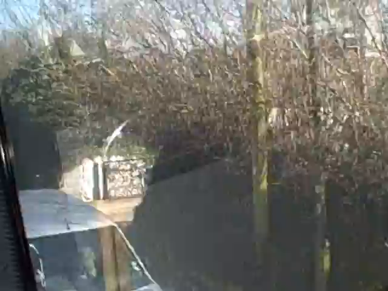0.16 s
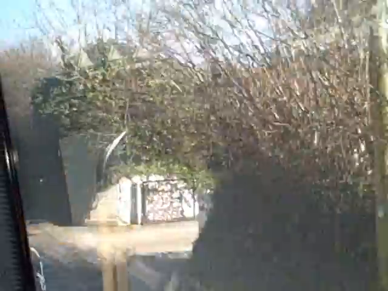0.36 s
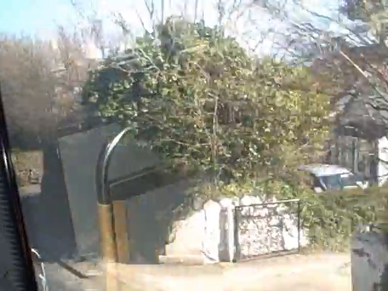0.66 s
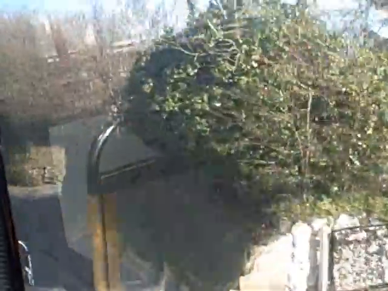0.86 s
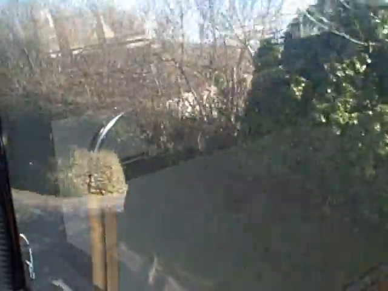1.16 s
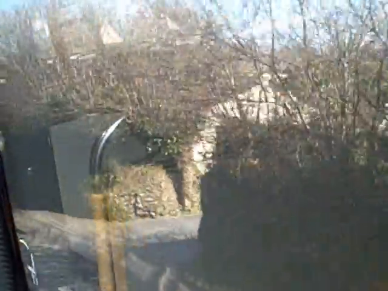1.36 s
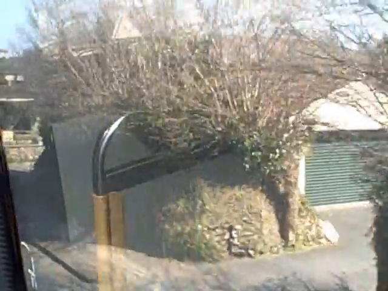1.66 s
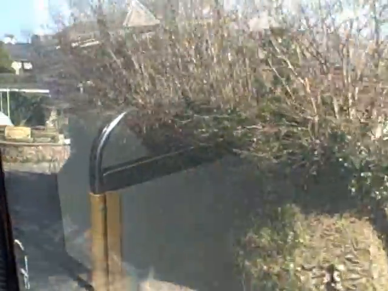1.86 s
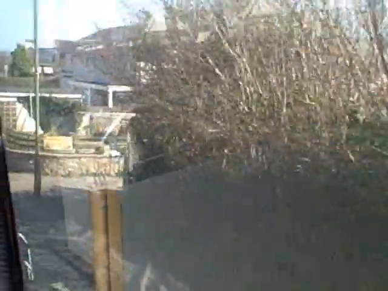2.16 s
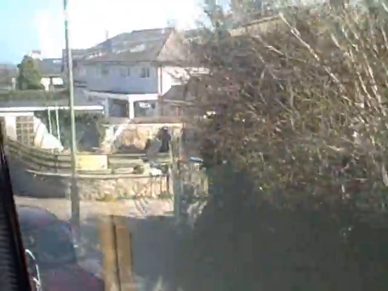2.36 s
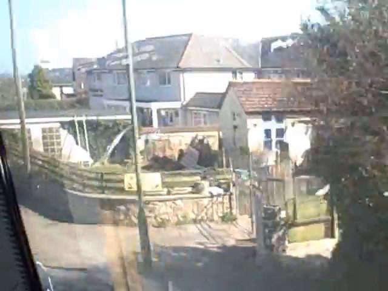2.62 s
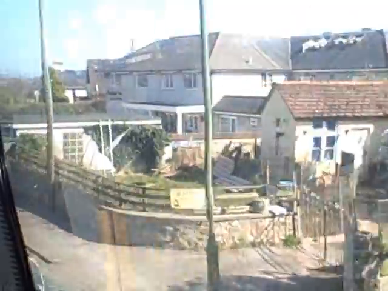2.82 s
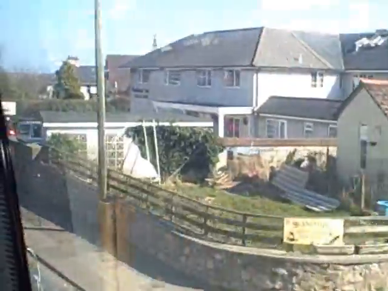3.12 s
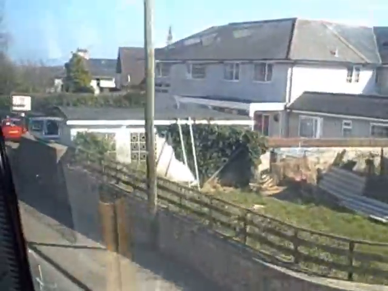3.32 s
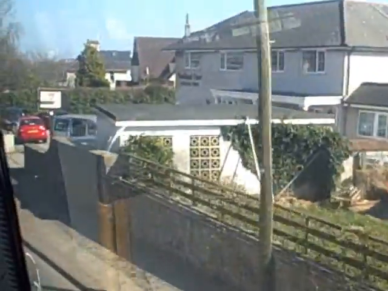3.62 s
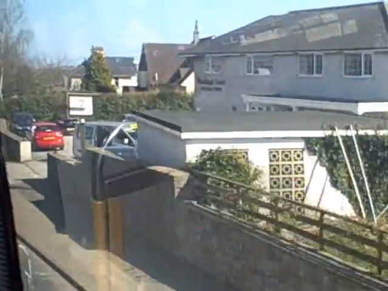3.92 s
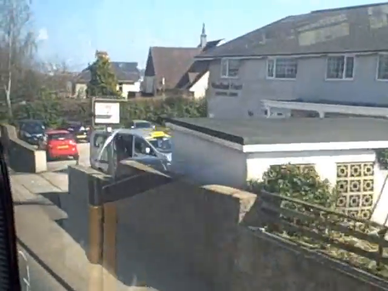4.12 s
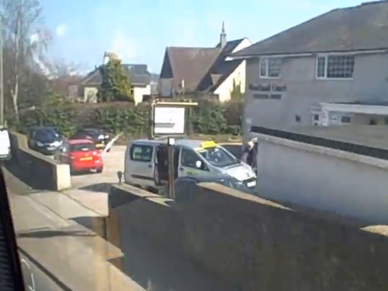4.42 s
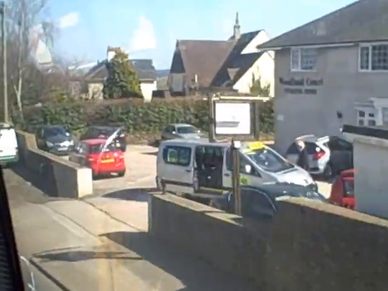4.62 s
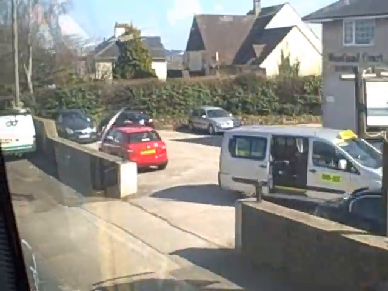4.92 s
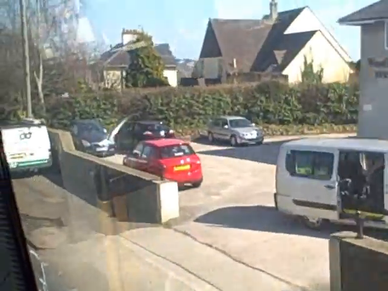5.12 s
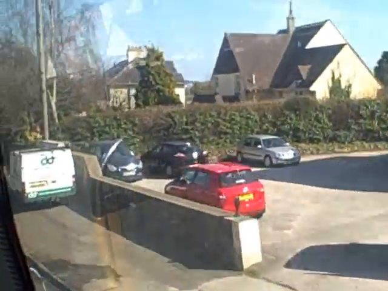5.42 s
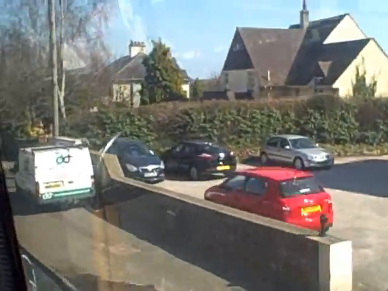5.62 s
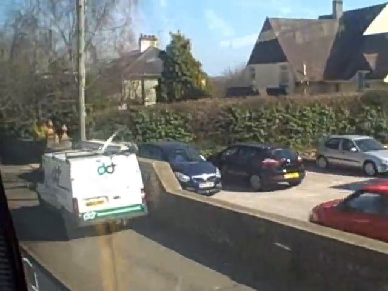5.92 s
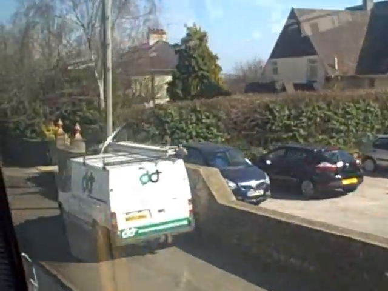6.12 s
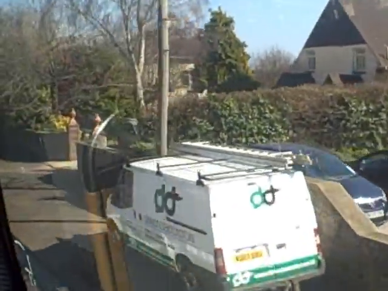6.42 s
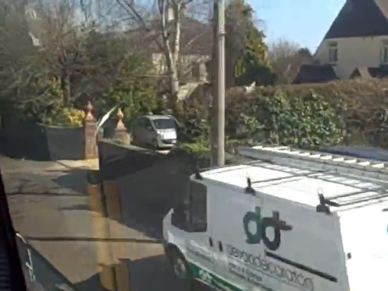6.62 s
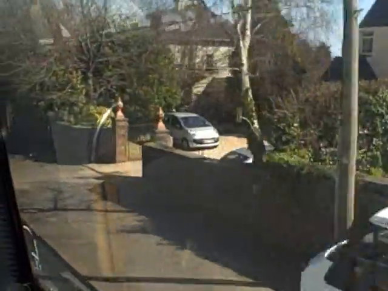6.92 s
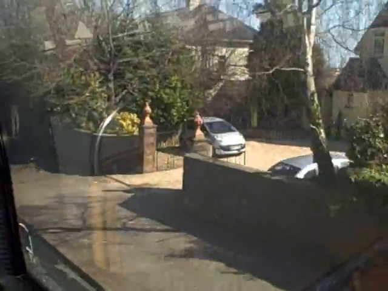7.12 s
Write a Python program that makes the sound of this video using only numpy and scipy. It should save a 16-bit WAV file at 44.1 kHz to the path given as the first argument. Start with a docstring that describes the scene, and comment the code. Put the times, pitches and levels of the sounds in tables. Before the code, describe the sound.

A bus cabin on a rough road: thick low rumble, humming diesel in one gear, soft combustion clatter and thin gear whine. Branches swish past in the first half second. The body shakes in uneven bursts with dry plastic rattles and bright ticks. Heavy pothole blows hit past five seconds, clipping and ducking the close microphone, and another jolt follows near 6.7 seconds as the drone carries on.

```python
"""Six-cylinder diesel and driveline of a double-decker bus drone through the cabin as speed slowly rises in one gear.
The drone is sine orders of engine speed, with gear whine and pulsed-noise combustion clatter.
Shaped noise makes the tyre roar, floor boom, body shaking, air hiss and twigs along the side.
Trim and small fittings rattle as bursts of ringing noise; panels knock as decaying sines.
Hard jolts are single low pushes, and a gain control ducks the din after an overload."""
import sys
import numpy as np
from scipy import signal
from scipy.fft import rfft, irfft, next_fast_len
from scipy.io import wavfile
from scipy.ndimage import uniform_filter1d, minimum_filter1d, map_coordinates

SR = 44100
rng = np.random.default_rng(int(sys.argv[2]) if len(sys.argv) > 2 else 0)


def unload_wav(signal):
    """Save mono or channel-first audio to the path in sys.argv[1] as 16-bit WAV at rate SR, clipped to [-1, 1]."""
    wavfile.write(
        sys.argv[1],
        SR,
        np.round(np.clip(np.atleast_2d(signal).T, -1, 1) * 32767).astype(np.int16),
    )


N = 320607

# Engine speed: (time [s], four-stroke cycle rate [1/s])
ENGINE_SPEED = [(0.0, 10.828), (0.48, 10.874), (0.97, 10.871), (1.45, 10.891), (1.94, 10.917),
                (2.42, 10.973), (2.91, 11.03), (3.39, 11.059), (3.88, 11.114), (4.36, 11.168),
                (4.85, 11.228), (5.33, 11.265), (5.82, 11.321), (6.3, 11.369), (6.79, 11.414),
                (7.27, 11.417)]
MIDDLE_SPEED_HZ = 11.14  # engine cycle rate
# Drone; mostly whole orders from the engine; fractional ones and 84 from the geared driveline:
# (multiple of cycle rate [-], level at middle speed [dB], slope [dB per cycle/s])
DRONE_ORDERS = [(12, -25, 7), (13, -35, -4), (13.62, -36.5, -9), (15, -28.3, -2), (17, -42, 5),
                (18, -42, -6), (19, -41, 9), (20, -46, -8), (20.43, -46, 9), (21, -33.5, -14), (22, -47, 2),
                (22.7, -36, -12), (25, -41, 9), (27.24, -44, 29), (28, -46, 6), (30, -51, 17),
                (31.78, -49, -7), (42, -57, 4), (44, -54, 13), (49.7, -54, 11), (60, -61, 20),
                (84, -55.5, 16), (88, -62, 12)]
# Drone level, slow changes, strongest in high orders: (time [s], level change at order 15 [dB])
DRONE_LEVEL = [(0, -1.5), (3, 0), (4.5, .5), (5.3, -0.5), (5.7, 2.5), (6.4, 0.45), (7.27, .5)]
# Gear whine: (time [s], relative tooth tone level [dB], relative octave level [dB])
GEAR_WHINE = [(0, -61, -77), (.5, -56, -76), (.8, -59, -75), (1.22, -56, -76), (1.31, -51, -78),
              (1.4, -58, -77), (2.1, -57, -73), (2.5, -63, -78), (5.5, -66, -77), (6.95, -64, -70),
              (7.04, -63, -62.5)]
TEETH_PER_CYCLE = 144  # tooth meshes per engine cycle
# Combustion clatter: (time [s], level [dB])
CLATTER_LEVEL = [(0, -42), (.35, -40), (.7, -45.5), (2, -46), (2.35, -45), (2.62, -40.5), (3.3, -47.5),
                 (4.3, -46.5), (5.3, -44.5), (5.55, -46), (6.3, -48), (6.7, -45), (7.27, -46)]
# Air hiss: (time [s], level [dB])
AIR_LEVEL = [(0, -55.5), (.33, -52), (.65, -59.5), (1.6, -61), (2.3, -64), (2.6, -56.5), (3.1, -56),
             (4.2, -61), (4.5, -62.5), (5.3, -55), (5.9, -61.5), (7.27, -61)]
# Road surface, before bumps: (time [s], tyre roar level [dB], floor boom level [dB])
ROAD_LEVELS = [(0, -30.5, -24), (1.1, -31, -26), (2, -31.5, -23.5), (3.4, -32, -26), (3.75, -30, -24.5),
               (4.05, -30.5, -30.5), (4.45, -32.5, -27.5), (4.9, -33, -24.5), (5.3, -31, -23.5),
               (5.7, -34, -25), (6.3, -33, -24.5), (7.27, -32.5, -26.5)]

# Rough road: (full strength from [s], hold [s], relative shaking [dB], relative chatter [dB])
ROUGH_STRETCHES = [(0.173, 0.17, -24.5, -55), (.52, .15, -21.5, -65), (0.863, 0.091, -14.5, -48.5),
                   (1.13, 0.37, -19, -57.5), (1.68, 0.11, -29, -55), (2.52, 0.22, -17.5, -53.5),
                   (2.891, .25, -13.5, -48.5), (3.172, 0.094, -11.5, -51), (3.394, 0.42, -21, -55),
                   (3.9, 0.2, -11.5, -50.5), (4.128, 0.15, -23, -58), (4.808, .15, -17, -49.5),
                   (5.03, 0.11, -19.5, -56), (5.244, 0.29, -10.5, -45), (5.5, 0.57, -13, -59),
                   (6.231, 0.078, -11.5, -52.5), (6.47, 0.086, -15, -55), (6.613, 0.074, -8.5, -45),
                   (6.83, 0.1, -24, -53)]
BUMP_ATTACK_S, SHAKE_RELEASE_S, CHATTER_RELEASE_S = 0.025, 0.059, 0.042
SMOOTH_SHAKE_DB, SMOOTH_CHATTER_DB = -21.5, -69  # floor on smooth road
# Pothole jolts: (time [s], peak level [dB], half length of push [s])
POTHOLE_JOLTS = [(5.286, 0, .016), (5.404, 7.5, .019), (5.476, 4.5, .021), (6.665, -2.5, .013)]
# Body panel knocks: (time [s], relative level [dB])
PANEL_KNOCKS = [(.34, -29), (.968, -27), (1.12, -29), (3.697, -24), (3.735, -26), (3.815, -30), (3.89, -26),
                (4.021, -19.5), (4.305, -25)]
# Panel modes: (frequency [Hz], mean relative level [dB], t60 [s])
PANEL_MODES = [(310, 1, .08), (365, 1, .07), (420, -2, .06), (490, -3, .06), (575, -5, .05), (660, -1, .05),
               (770, -4, .04)]

# Trim against its frame: (first blow [s], number of blows [-], relative level [dB])
TRIM_RATTLES = [(.545, 2, -34), (.636, 3, -35.5), (.838, 2, -34), (.99, 1, -35.5), (1.155, 2, -35),
                (1.346, 1, -35.5), (1.447, 1, -40), (1.786, 5, -31), (2.188, 1, -38.5), (2.521, 1, -29.5),
                (2.62, 1, -36), (2.851, 1, -33.5), (2.928, 2, -33.5), (3.224, 1, -30.5), (3.295, 1, -37),
                (3.371, 1, -39), (3.664, 2, -30.5), (3.757, 1, -36), (3.944, 6, -32), (4.304, 1, -32),
                (4.662, 1, -36), (4.769, 2, -35), (4.961, 1, -32), (5.088, 2, -33.5), (5.242, 1, -26.5),
                (5.283, 1, -30.5), (5.33, 2, -28), (5.724, 3, -38), (6.227, 1, -34), (6.397, 1, -32.5),
                (6.489, 5, -32), (6.755, 1, -36), (6.858, 4, -32), (7.17, 1, -36)]
SWING_S = 0.057  # between blows of a run
RUN_FADE_DB, BLOW_SCATTER_DB = 0.77, 1.3  # loss per blow, standard deviation
# Close small fitting: (time [s], relative level [dB])
FITTING_TICKS = [(0.4693, -27), (0.9492, -36), (1.2176, -35), (2.0892, -43), (3.0849, -32), (3.1772, -32),
                 (3.5134, -29.5), (3.7888, -31), (3.9075, -37), (4.0637, -32), (4.4313, -39),
                 (4.8708, -26.5), (5.0838, -31), (5.3443, -24), (5.3622, -28), (5.4121, -15.5),
                 (5.5817, -24), (6.2706, -34), (6.5266, -27), (6.6338, -23), (6.8304, -38)]
BOUNCE_T60_S, CHATTER_T60_S = 0.014, 0.035

# Twigs: (middle [s], 1/e half length [s], centre [Hz], relative level [dB])
TWIG_SWISHES = [(0.24, 0.083, 8200, -47), (0.34, 0.066, 6100, -51), (0.22, 0.055, 3900, -54),
                (0.68, 0.091, 8400, -60), (1.667, 0.063, 7800, -57.5)]
# Twig squeal on glass: (frequency [Hz], mean relative level [dB])
SQUEAL_PARTIALS = [(3850, -6), (6550, 0), (8250, -9), (11600, -10), (13000, -8)]

# Noise spectra: (frequency [Hz], relative density [dB per Hz])
SWAY_SPECTRUM = [(4, -30), (9, -8), (14, 0), (18, -6), (23, -24), (40, -60)]
JUDDER_SPECTRUM = [(14, -53), (21, 4), (26, -4), (31, -2.5), (38, -18.5), (48, -31.5), (80, -44)]
BOOM_SPECTRUM = [(25, -28), (42, -0.5), (52, 3), (63, -8.5), (84, 4), (100, -4), (120, -16), (200, -51)]
ROAR_SPECTRUM = [(80, -21), (125, 4.5), (150, 13.5), (200, 8.5), (250, 5), (330, 8), (420, 0.5), (510, 1),
                 (670, -2), (780, -6.5), (950, -6.5), (1200, -17), (2500, -52)]
CLATTER_SPECTRUM = [(400, -25), (800, 2.5), (1000, 3.5), (1200, -1), (1650, -1.5), (2100, -6.5),
                    (2700, -12.5), (3300, -12.5), (4500, -19.5), (8000, -31), (16000, -66)]
HISS_SPECTRUM = [(1500, 2.5), (3200, 2), (5000, 2), (8000, -2.5), (11000, -3), (15500, -11)]
CLACK_SPECTRUM = [(300, -35), (900, 10), (2000, 7), (3500, 6), (5500, 2.5), (7500, -4), (9500, -9),
                  (12000, -4.5), (16000, -20)]
TICK_SPECTRUM = [(3000, -40), (7000, -9.5), (9300, -4.5), (11000, -8.5), (13000, -3), (15500, -2)]

OVERLOAD_DB, DUCK_ATTACK_S = 1.5, 0.006
DUCK_HOLD_S, RECOVER_DB_PER_S = 0.46, 11.5
TOP_HZ = 15950


def amp(db):
    """Decibels to gain."""
    return 10 ** (np.asarray(db) / 20)


def unit(x):
    """Scale to rms 1."""
    return x / np.sqrt(np.mean(x ** 2) + 1e-20)


def curves(rows):
    """One value per sample for each column after the time."""
    time_s, *columns = np.transpose(rows)
    t = np.arange(N) / SR
    return [np.interp(t, time_s, column) for column in columns]


def wobble(rate_hz):
    """Smooth random curve through rate_hz knots a second."""
    knots = rng.standard_normal(int(N * rate_hz / SR) + 4)
    return map_coordinates(knots, [np.arange(N) * rate_hz / SR])


def coloured(x, points):
    """Shape x by (Hz, dB) points; white noise keeps its power."""
    size = next_fast_len(N + SR // 2)
    hz, db = np.transpose(points)
    bins_hz = np.fft.rfftfreq(size, 1 / SR)
    gain = amp(np.interp(np.log(bins_hz + 1), np.log(hz + 1), db, right=-120))
    return irfft(rfft(x, size) * unit(gain), size)[:N]


def noise(points):
    """Coloured noise of rms 1."""
    return unit(coloured(rng.standard_normal(N), points))


def even(x, window_s):
    """Flatten the swells of a noise that outlast window_s."""
    power = np.abs(signal.hilbert(x)) ** 2
    mean_power = np.abs(uniform_filter1d(power, int(window_s * SR) + 1))
    return unit(x / np.sqrt(mean_power + 1e-6))


def tone(turns, smear_rad):
    """Sine of rms 1 with an added phase deviation."""
    return np.sqrt(2) * np.sin(2 * np.pi * (turns + rng.random()) + smear_rad)


def ringing(points, ripple_db=1.0, ripple_hz=170):
    """A tenth of a second of noise through the dense, uneven resonances of one piece of trim."""
    size = SR // 10
    bins_hz = np.fft.rfftfreq(size, 1 / SR)
    hz, db = np.transpose(points)
    ripple = map_coordinates(rng.standard_normal(len(bins_hz)), [bins_hz / ripple_hz], mode="wrap")
    shape_db = np.interp(np.log(bins_hz + 1), np.log(hz + 1), db, left=-120, right=-120)
    gain = amp(shape_db + ripple_db * ripple)
    return unit(irfft(rfft(rng.standard_normal(size)) * gain, size))


def blow(t60_s, bounce_s, bounce_db, rise_s):
    """Envelope of one contact and two smaller bounces at random delays."""
    t = np.arange(SR // 10) / SR
    power = amp(-60 * t / t60_s) ** 2 * (1 - np.exp(-t / rise_s))
    for delay_s in rng.random(2) * bounce_s:
        power += (t > delay_s) * amp(bounce_db - 60 * np.abs(t - delay_s) / BOUNCE_T60_S) ** 2
    return np.sqrt(power)


def bumpiness():
    """Shaking and chatter [dB]: each rough stretch builds them up, holds, then lets them decay."""
    t = np.arange(N) / SR
    shake_power, chatter_power = amp(SMOOTH_SHAKE_DB) ** 2, amp(SMOOTH_CHATTER_DB) ** 2
    for start_s, hold_s, shake_db, chatter_db in ROUGH_STRETCHES:
        rise = np.clip((t - start_s) / BUMP_ATTACK_S + 1, 0, 1)
        after_s = np.maximum(t - start_s - hold_s, 0)
        shake = amp(shake_db) * rise * np.exp(-after_s / SHAKE_RELEASE_S)
        chatter_gain = amp(chatter_db) * rise * np.exp(-after_s / CHATTER_RELEASE_S)
        shake_power = shake_power + shake ** 2
        chatter_power = chatter_power + chatter_gain ** 2
    return 10 * np.log10(shake_power), 10 * np.log10(chatter_power)


def air_hiss():
    """Broadband air noise on a slow level curve."""
    level_db, = curves(AIR_LEVEL)
    return amp(level_db) * noise(HISS_SPECTRUM)


def tyre_roar(shake_db, roar_db, grows=0.046, flutter_db=1.16):
    """Fluttering tyre noise that grows slightly on rough road."""
    level_db = roar_db + grows * (shake_db - SMOOTH_SHAKE_DB) + flutter_db * wobble(25)
    return amp(level_db) * noise(ROAR_SPECTRUM)


def floor_boom(shake_db, boom_db, grows=0.3):
    """Floor resonances boom louder on rough road."""
    level_db = boom_db + grows * (shake_db - SMOOTH_SHAKE_DB)
    return amp(level_db) * even(noise(BOOM_SPECTRUM), 0.074)


def body_shaking(shake_db, sway_db=1, judder_db=-3):
    """Bumps rock the upper deck; each jolt is one heavy push that briefly displaces the rocking."""
    t = np.arange(N) / SR
    rocking = amp(shake_db + sway_db) * even(noise(SWAY_SPECTRUM), 0.08)
    rocking += amp(shake_db + judder_db) * even(noise(JUDDER_SPECTRUM), 0.08)
    pushes = np.zeros(N)
    for time_s, peak_db, half_s in POTHOLE_JOLTS:
        u = (t - time_s) / half_s
        pushes += amp(peak_db) * (1 - 2 * u ** 2) * np.exp(-u ** 2)
        rocking *= 1 - np.exp(-(u / 2) ** 2)
    return rocking + pushes


def twigs(scratch_db=2.5, skirt_db=-12, squeal_db=-51, squeal_s=0.3, squeal_half_s=0.16):
    """Twigs brush past in short scratchy noise swells; one swell of unsteady tones squeals on glass."""
    t, out = np.arange(N) / SR, np.zeros(N)
    for middle_s, half_s, hz, db in TWIG_SWISHES:
        band = [(hz / 4, -40), (hz * 0.76, skirt_db), (hz, 0), (hz * 1.44, skirt_db), (hz * 2, -28)]
        out += amp(db) * np.exp(-((t - middle_s) / half_s) ** 2) * noise(band)
    squeal = np.zeros(N)
    for hz, db in SQUEAL_PARTIALS:  # each wavers on its own
        squeal += amp(db + 4 * wobble(30)) * tone(hz * t, 2 * wobble(400))
    out += amp(squeal_db) * np.exp(-((t - squeal_s) / squeal_half_s) ** 2) * unit(squeal)
    return out * amp(scratch_db * wobble(180))


def chatter(level_db, fizz_db=-5, tick_db=-4.0, clack_db=-1, contacts_hz=120, spread_db=5):
    """Small fittings buzz in dense, irregular contacts, harder on rough road."""
    t = np.arange(SR // 20) / SR
    strengths = amp(spread_db * np.clip(rng.standard_normal(N), -2, 2))
    contacts = (rng.random(N) < contacts_hz / SR) * strengths
    power = signal.fftconvolve(contacts ** 2, amp(-60 * t / CHATTER_T60_S) ** 2)[:N]
    bursts = unit(np.sqrt(np.abs(power)))
    contact_noise = amp(tick_db) * noise(TICK_SPECTRUM) + amp(clack_db) * noise(CLACK_SPECTRUM)
    return amp(level_db) * (bursts * contact_noise + amp(fizz_db) * noise(HISS_SPECTRUM))


def ticks(tick_db=-10, clack_db=-6):
    """A small hard fitting snaps against its seat, short and bright."""
    out = np.zeros(N + SR)
    for time_s, db in FITTING_TICKS:
        colour = ringing(TICK_SPECTRUM) + amp(clack_db) * ringing(CLACK_SPECTRUM)
        envelope = blow(t60_s=0.04, bounce_s=0.009, bounce_db=-7, rise_s=0.0004)
        out[round(time_s * SR):][:len(colour)] += amp(db + tick_db) * colour * envelope
    return out[:N]


def rattles(clack_db=-5.5, bright_db=-13):
    """Loose trim clacks dryly once a swing, on average weaker each time."""
    out = np.zeros(N + SR)
    for start_s, blows, db in TRIM_RATTLES:
        for k in range(round(blows)):
            colour = ringing(CLACK_SPECTRUM) + amp(bright_db) * ringing(TICK_SPECTRUM)
            level_db = db + clack_db - RUN_FADE_DB * k + BLOW_SCATTER_DB * rng.standard_normal()
            envelope = blow(t60_s=0.045, bounce_s=0.011, bounce_db=-5, rise_s=0.00056)
            first = round((start_s + SWING_S * k) * SR)
            out[first:][:len(colour)] += amp(level_db) * colour * envelope
    return out[:N]


def knocks(rise_s=0.00056, level_db=-11, spread_db=2):
    """A panel thuds in its frame, its modes at new strengths each time."""
    out, t = np.zeros(N + SR), np.arange(SR // 5) / SR
    for time_s, db in PANEL_KNOCKS:
        ring = np.zeros(len(t))
        for hz, mode_db, t60_s in PANEL_MODES:
            strength_db = mode_db + spread_db * rng.standard_normal()
            ring += amp(strength_db - 60 * t / t60_s) * tone(hz * t, 0)
        out[round(time_s * SR):][:len(t)] += amp(db + level_db) * ring * (1 - np.exp(-t / rise_s))
    return out[:N]


def combustion_clatter(cycles, firing_depth=0.13):
    """Six cylinders pulse the clatter noise six times per four-stroke cycle."""
    level_db, = curves(CLATTER_LEVEL)
    firing = 1 + firing_depth * np.cos(2 * np.pi * 6 * cycles)
    return amp(level_db) * unit(firing * noise(CLATTER_SPECTRUM))


def whine(cycles):
    """Meshing gear teeth sing a thin, wavering note and its octave."""
    tooth_db, octave_db = curves(GEAR_WHINE)
    backlash_rad = 0.7 * wobble(30)
    swell = amp(1.3 * wobble(14) - 0.5)
    tooth = amp(tooth_db) * tone(TEETH_PER_CYCLE * cycles, backlash_rad)
    octave = amp(octave_db) * tone(2 * TEETH_PER_CYCLE * cycles, 2 * wobble(70))
    return swell * (tooth + octave)


def drone(speed_hz, cycles, waver_db=1.0, tilt=0.21):
    """Engine and shaft orders swell and fade as speed carries them across the cabin's resonances."""
    out = np.zeros(N)
    change_db, = curves(DRONE_LEVEL)
    for order, db, slope_db in DRONE_ORDERS:
        level_db = db + slope_db * (speed_hz - MIDDLE_SPEED_HZ) + waver_db * wobble(7)
        level_db += change_db * (order / 15) ** tilt  # strongest in high orders
        smear_rad = 0.07 * np.sqrt(order / 12) * wobble(10)
        out += amp(level_db) * tone(order * cycles, smear_rad)
    return out


def gain_control(x):
    """An overload quickly turns the gain down; it stays down a while, then creeps back."""
    over_db = np.maximum(20 * np.log10(np.abs(x) + 1e-9) - OVERLOAD_DB, 0)
    half_hold = int(DUCK_HOLD_S * SR) // 2
    # origin makes the window look back only
    held_db = -minimum_filter1d(-over_db, 2 * half_hold + 1, origin=half_hold, mode="constant")
    ramp_db = RECOVER_DB_PER_S * np.arange(N) / SR
    duck_db = np.maximum.accumulate(held_db + ramp_db, axis=-1) - ramp_db
    pole = np.exp(-1 / (DUCK_ATTACK_S * SR))
    return x * amp(-signal.lfilter([1 - pole], [1, -pole], duck_db))


def scene():
    """Sum of all sources as heard from a seat upstairs."""
    speed_hz, = curves(ENGINE_SPEED)
    cycles = np.cumsum(speed_hz) / SR
    shake_db, chatter_db = bumpiness()
    roar_db, boom_db = curves(ROAD_LEVELS)
    road = tyre_roar(shake_db, roar_db) + floor_boom(shake_db, boom_db) + body_shaking(shake_db)
    fittings = chatter(chatter_db) + ticks() + rattles() + knocks()
    engine = combustion_clatter(cycles) + whine(cycles) + drone(speed_hz, cycles)
    return (air_hiss() + road + twigs() + fittings + engine)[None]


def record(dry):
    """Gain control, soft clipping of the microphone overload, then a sharp band limit."""
    ducked = gain_control(dry)
    clipped = ducked / (1 + np.abs(ducked / 0.98) ** 20) ** (1 / 20)
    size = next_fast_len(N + SR // 2)
    passband = np.fft.rfftfreq(size, 1 / SR) < TOP_HZ
    return irfft(rfft(clipped, size) * passband, size)[:, :N]


dry = scene()
out = record(dry)
unload_wav(out)
```